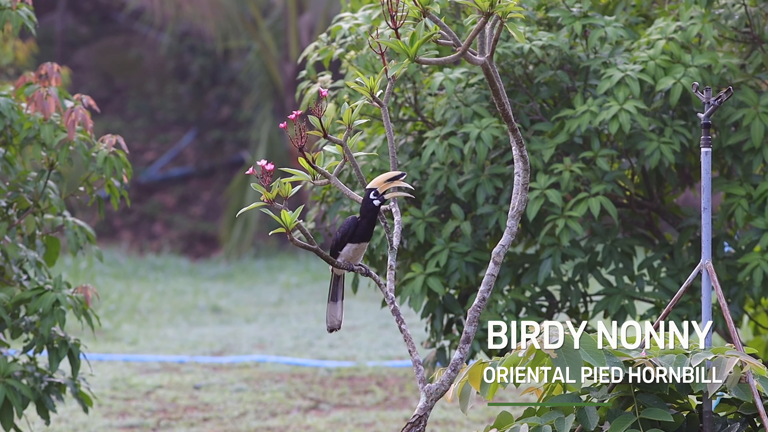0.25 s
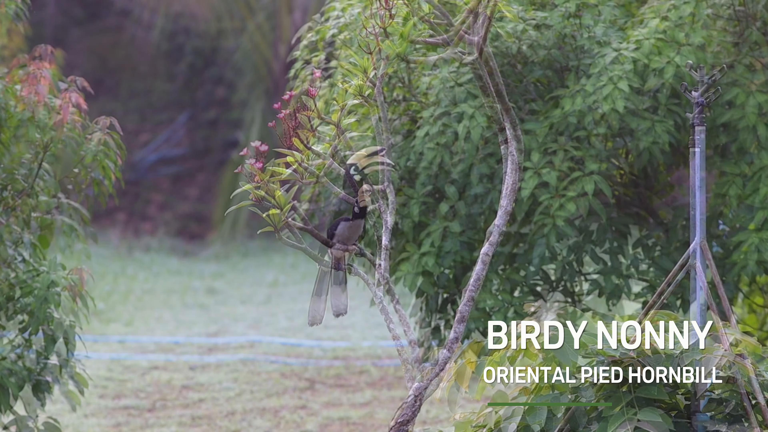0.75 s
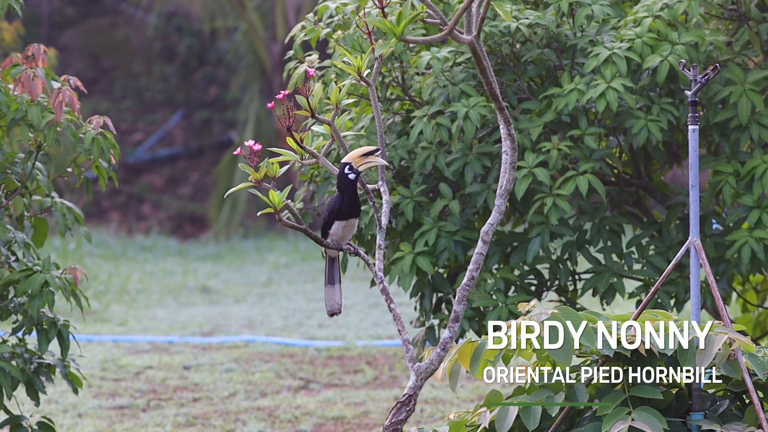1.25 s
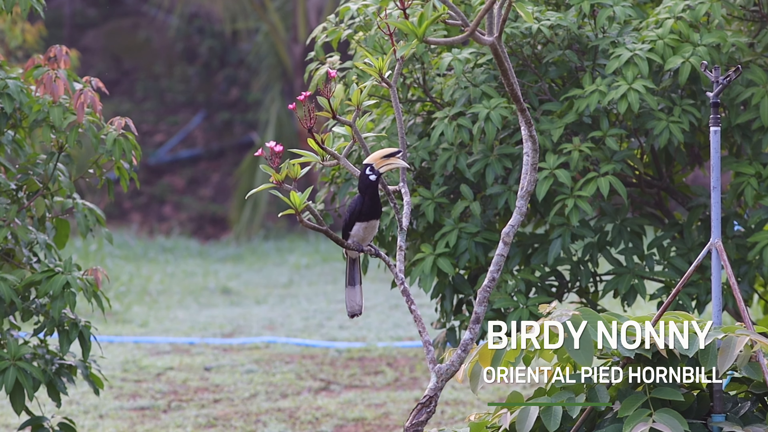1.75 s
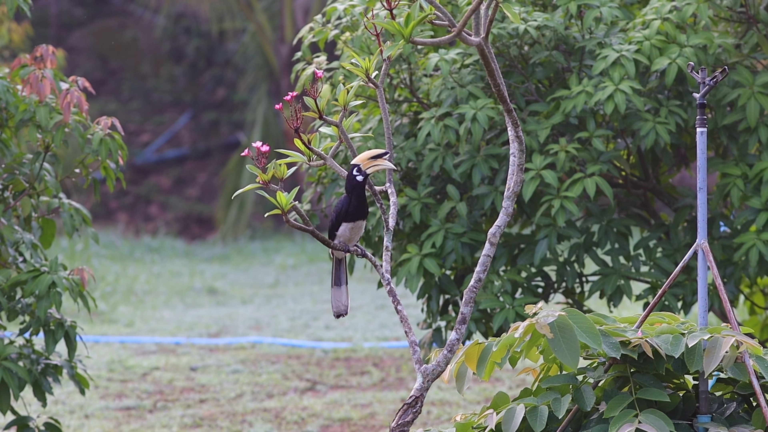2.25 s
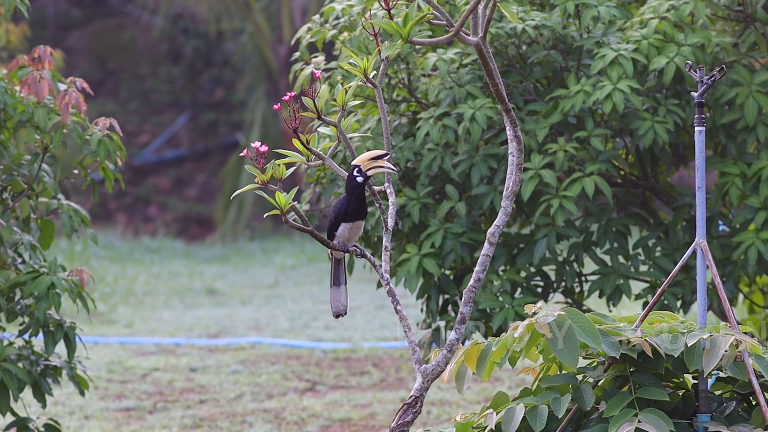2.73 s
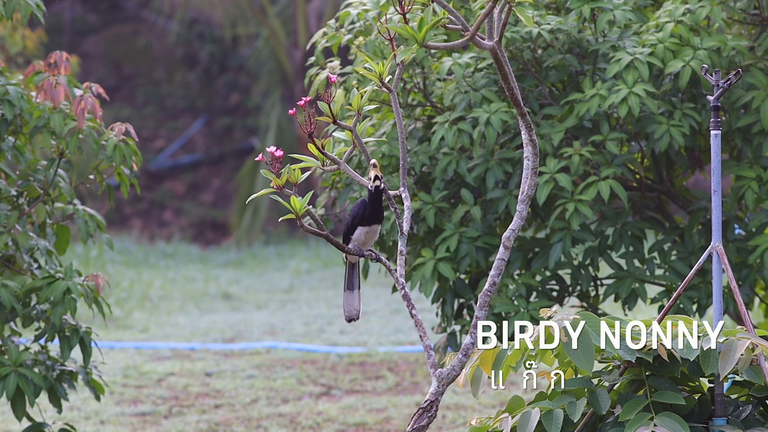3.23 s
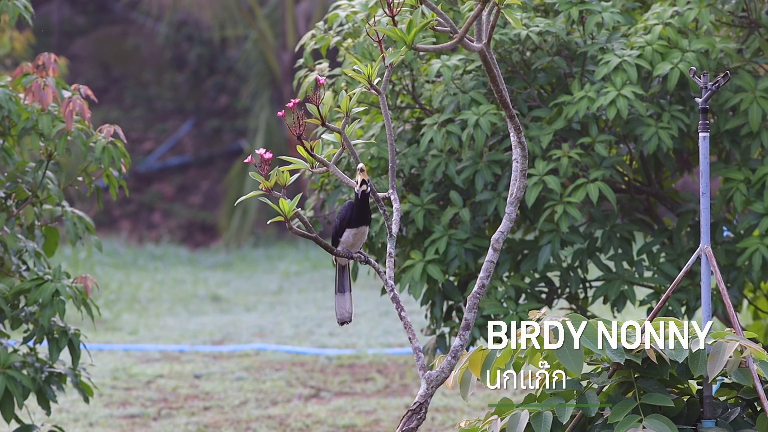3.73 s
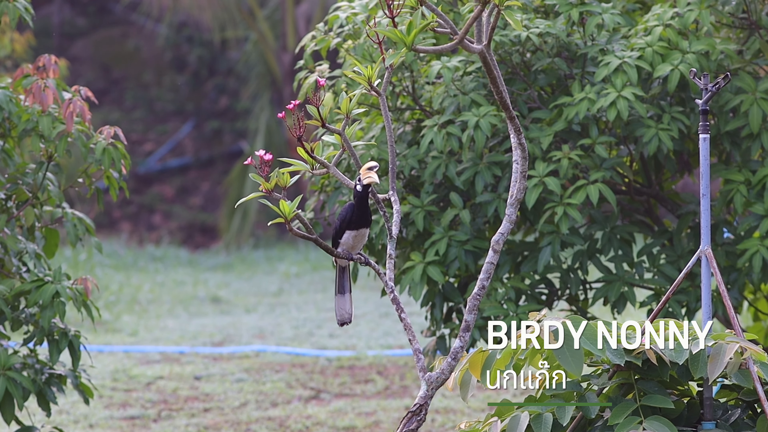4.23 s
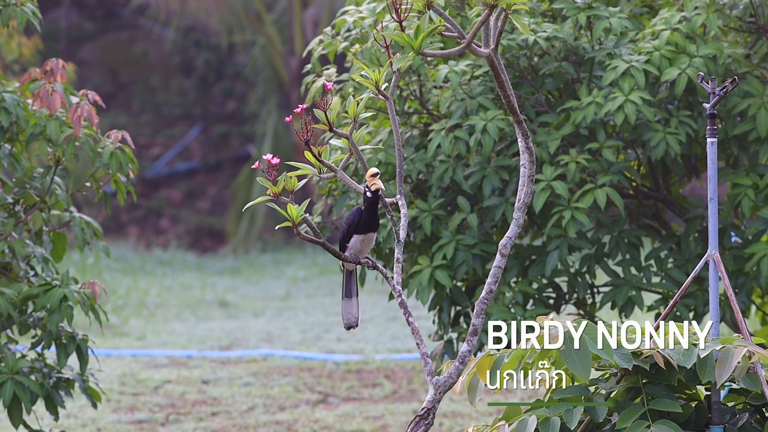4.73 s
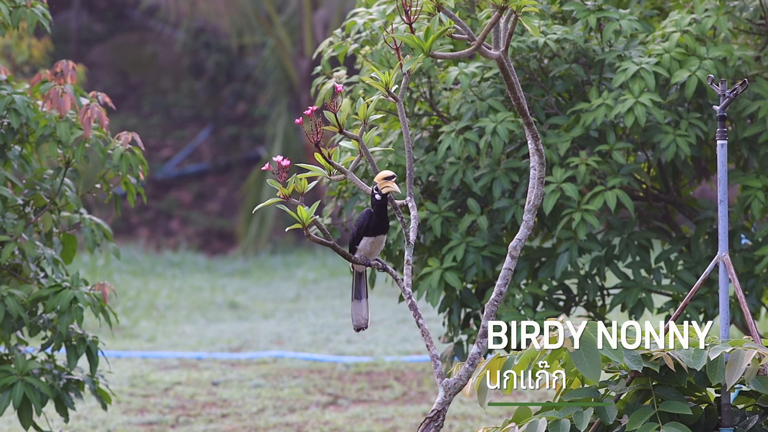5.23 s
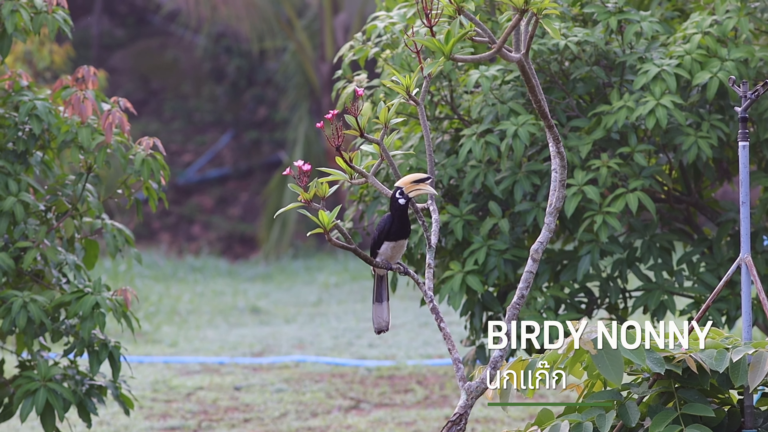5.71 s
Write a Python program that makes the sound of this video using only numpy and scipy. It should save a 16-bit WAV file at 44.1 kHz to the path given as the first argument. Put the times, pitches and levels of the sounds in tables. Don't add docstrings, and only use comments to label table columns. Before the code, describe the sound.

A hornbill cackles close by in two bursts of short harsh notes, split by a gap of insects, faint whistles and soft chirps.

```python
import sys
import numpy as np
from scipy import signal
from scipy.fft import rfft, irfft, next_fast_len
from scipy.io import wavfile
from scipy.ndimage import uniform_filter1d, map_coordinates

SR = 44100
rng = np.random.default_rng(int(sys.argv[2]) if len(sys.argv) > 2 else 0)


def transcribe(u):
    v = np.clip(np.atleast_2d(u).T, -1, 1)
    q = np.round(v * 32767).astype(np.int16)
    wavfile.write(sys.argv[1], SR, q)


def makeup_ratio(level_db):
    decades = np.asarray(level_db, float) / 20
    return 10 ** decades


N = 263277
LEAD = SR // 5


def along(points, hz):
    f, value = np.transpose(points)
    return np.interp(np.log(hz + 1), np.log(f + 1), value)


def unit(x):
    return x / np.sqrt(np.mean(x ** 2) + 1e-20)


def wobble(rate_hz, size):
    knots = rng.standard_normal(int(size * rate_hz / SR) + 4)
    return map_coordinates(knots, [np.arange(size) * rate_hz / SR])


def filtered(x, response):
    m = next_fast_len(x.shape[-1] + SR // 4)
    return irfft(rfft(x, m) * response(np.fft.rfftfreq(m, 1 / SR)), m)[..., :x.shape[-1]]


# start_s, length_s, top_slap_rate_hz, level_db, slow_cycle_share_0_to_1
ARCHED_NOTES = [
    (-.11, 0.045, 1275, -16.5, 0.6),
    (.061, 0.054, 1210, -19.5, 0.05),
    (2.773, .057, 1362, -17.5, 0.35),
    (3.162, 0.053, 1262, -12, 0.64),
    (3.315, .053, 1234, -12, 0.2),
    (3.484, 0.055, 1226, -13.5, 0.12),
    (3.967, 0.051, 1243, -13, 0.16),
]
SQUEALED_NOTES = [
    (3.649, .056, 2676, -13, 0.083),
    (3.806, .063, 2718, -13.5, 0.1),
]
LEVEL_NOTES = [(2.995, .057, 2120, -15, .12), (4.129, .05, 1460, -17.5, .13)]
RISING_NOTES = [(.231, .045, 1430, -21, .28)]
# start_s, length_s, start_hz, end_hz, level_db
CLUCKS = [(.419, .014, 1152, 1146, -34)]


def near_hornbill():
    hoarse, shrill, pure = (.45, .3, .22), (.45, .38, .1), (.35, .16, .05)
    voices = [
        (ARCHED_NOTES, hoarse,
         dict(count=2, creak=0.99, dip=.86, fall=0.78, end=0.72, hold=.5, drop=.03, tilt_db=-0.5)),
        (SQUEALED_NOTES, shrill,
         dict(count=4, creak=1, dip=.8, fall=.75, end=.7, hold=.67, drop=.009, tilt_db=-6)),
        (LEVEL_NOTES, pure,
         dict(count=3, creak=0.96, dip=0.86, fall=0.94, end=0.93, hold=0.567, drop=.03, tilt_db=0.5)),
        (RISING_NOTES, pure,
         dict(count=3.5, creak=.6, dip=.93, fall=.985, end=0.79, hold=0.56, drop=.03, tilt_db=1))]
    notes = [note(*row, **voice, quality=quality) for rows, quality, voice in voices for row in rows]
    return cackle(notes + [croak(*row) for row in CLUCKS])


def note(start_s, length_s, hz, db, top_slow, count, creak, dip, fall, end, hold, drop, tilt_db, quality):
    slow, rough, clear = quality
    creak_s, snap_s, climb_s, release_s = .0095, .0025, .01, .011
    creak_slow, creak_rough = .9, .2
    snap = creak_s + snap_s
    top = snap + climb_s
    held = np.clip(hold * length_s, top + .001, length_s - release_s - .001)
    halfway = dip + 0.782 * (1 - dip)
    rows = [(0, count * creak * 680, -14, creak_slow, creak_rough),
            (creak_s, count * creak * 755, 4, creak_slow, creak_rough),
            (snap, dip * hz, 1, slow, rough),
            (snap + climb_s / 2, halfway * hz, 0, top_slow, clear),
            (top, hz, 0, top_slow, clear),
            (held, hz, 0, top_slow, clear),
            (min(held + drop, length_s - release_s), fall * hz, 0.3, slow, rough),
            (length_s, end * hz, -6.5, slow, rough)]
    gape_db = 0.44 * (db + 22.5)
    return count, np.array(rows) + [start_s, 0, db, 0, 0], tilt_db + gape_db


def croak(start_s, length_s, start_hz, end_hz, db):
    u = np.array([0, .18, 1 - .35, 1])
    level_db = db - 12 * np.array([1, 0, 0, 1])
    slow, rough = np.full(4, .5), np.full(4, .45)
    return 2, np.transpose([start_s + length_s * u, start_hz + (end_hz - start_hz) * u, level_db, slow, rough]), 0


def cackle(notes):
    out = np.zeros(N + LEAD)
    for group, rows, tilt_db in notes:
        s, *columns = np.transpose(rows)
        at = np.arange(round(s[0] * SR), round(s[-1] * SR))
        hz, db, slow, rough = [np.interp(at / SR, s, c) for c in columns]
        rough, group = np.clip(rough, 0, 1), round(group)
        jitter = 1 + .04 * rough * wobble(600, len(at))
        turn = np.cumsum(hz * jitter) / SR / group
        k = np.arange(1, 40)[:, None]
        share = np.where(k % group == 0, 1, np.clip(slow, 0, 1)) * (k * hz / group < 15000)
        share = share / np.sqrt(np.mean(share ** 2, axis=0))
        flicker = makeup_ratio(2.5 * np.array([wobble(80, len(at)) for _ in k]))
        spread = rng.normal(0, .7, k.shape)
        slaps = np.sum(share * flicker * np.cos(2 * np.pi * k * turn + spread), axis=0)
        slaps = slaps * makeup_ratio(4 * rough * wobble(800, len(at)))
        breath = rng.standard_normal(len(at)) * (1 + .9 * np.cos(2 * np.pi * turn * group))
        voiced = unit(slaps) * (1 - rough) + (.04 + .8 * rough) * breath
        bill = lambda f: throat(f) * makeup_ratio(tilt_db * np.log2((f + 300) / 3000))
        loud = np.sqrt(np.mean(filtered(voiced, bill) ** 2))
        sound = filtered(np.pad(voiced * makeup_ratio(db) / loud, (0, LEAD // 10)), bill)
        out[at[0] + LEAD:][:len(sound)] += sound
    return out


# centre_hz, width_hz, level_db
THROAT_MODES = [(1140, 2040, -8.5), (2180, 585, 1.5), (2590, 263, -1.5), (3250, 530, 0), (4330, 696, -0.5),
                (5560, 1230, -3.5), (6830, 740, -6), (8570, 1360, -17.5), (13113, 2825, -38)]


def throat(f):
    body = 0
    for k, (centre, width, db) in enumerate(THROAT_MODES):
        loss = 1j * f * width
        body = body + (-1) ** k * makeup_ratio(db) * loss / (centre * centre - f * f + loss)
    pocket = (1620 ** 2 - f * f + 1j * f * 200) / (1620 ** 2 - f * f + 1j * f * 800)
    radiation = (f * f / (f * f - 1700 ** 2 - 1j * f * 1500)) ** 2
    return body * pocket * radiation / (1 + 1j * f / 7000) ** 3


# frequency_hz, t60_s
GARDEN_DECAY = [(1000, 0.64), (3000, 0.33), (7000, 0.43), (13000, 0.32)]
# delay_s, level_db
WALL_ECHOES = [
    (0.037, -5.5),
    (.05, -17.5),
    (0.069, -25),
]


def garden(x):
    hz, t, z = signal.stft(rng.standard_normal((2, SR // 2)), SR, nperseg=256)
    decay = makeup_ratio(-60 * t / along(GARDEN_DECAY, hz)[:, None])
    tail = signal.istft(z * decay, SR, nperseg=256)[1]
    t = np.arange(tail.shape[1]) / SR
    echoes = sum(makeup_ratio(db + 7.5) * np.exp(-((t - s) / 0.0014) ** 2) for s, db in WALL_ECHOES)
    tail = tail * (np.clip(t / 0.0054, 0, 1) + echoes)
    power = abs(rfft(tail)) ** 2
    even = uniform_filter1d(power, size=800, axis=1) / uniform_filter1d(power, size=40, axis=1)
    tail = irfft(rfft(tail) * np.sqrt(even), tail.shape[1])
    return signal.fftconvolve(x[None], tail / np.linalg.norm(tail[0]), axes=1)[:, :x.shape[-1]]


# start_s, length_s, start_hz, end_hz, level_db
FAR_CROAKS = [
    (.46, 0.084, 1093, 1167, -42.5),
    (0.634, 0.089, 1067, 1518, -44.5),
    (0.819, .11, 1198, 1500, -46),
    (.94, 0.077, 1750, 2061, -44),
    (5.539, .12, 1363, 1764, -58),
    (5.74, 0.043, 960, 1060, -57),
]


def far_hornbill():
    dull = lambda f: (1j * f * 1200 / (2700 ** 2 - f * f + 1j * f * 1200)) ** 2
    return filtered(cackle([croak(*row) for row in FAR_CROAKS]), dull) * makeup_ratio(10.0)


# start_s, length_s, pitch_hz, level_db
PIPER_WHISTLES = [(.54, .12, 1940, -56), (.95, .26, 1805, -44.5), (1.08, .23, 2080, -44.5),
                  (1.3, .12, 1568, -53), (1.99, .2, 3895, -52), (2.46, .12, 2660, -51),
                  (2.42, .2, 3630, -55), (2.585, .22, 1803, -46.5), (2.71, .12, 2078, -47),
                  (4.29, .22, 1805, -47), (4.4, .16, 2057, -55)]
# start_s, length_s, start_hz, end_hz, level_db
GLIDING_CHIRPS = [(1.36, .06, 3300, 3130, -47), (1.4, .05, 2650, 2550, -48), (1.66, .12, 1870, 1945, -45),
                  (1.81, .07, 3190, 3230, -45), (1.86, .06, 2590, 2700, -48), (1.93, .05, 2195, 2280, -44),
                  (2.11, .05, 2305, 2250, -49), (4.51, .11, 1620, 1555, -47), (5.74, .05, 1930, 2000, -51),
                  (4.695, .08, 2480, 1700, -45), (4.77, .09, 1750, 2380, -47), (4.79, .07, 1560, 2000, -50)]
# start_s, level_db
DOVE_COOS = [
    (1.08, -48),
    (3.15, -51),
    (5.23, -49),
    (5.48, -48),
]


def songbirds():
    out = np.zeros(N + SR)
    sag = .006 / 2
    songs = [(s, length, hz * (1 + sag), hz * (1 - sag), db) for s, length, hz, db in PIPER_WHISTLES]
    songs += [tuple(row) for row in GLIDING_CHIRPS]
    songs += [(s, .14, 587.5, 587.5, db) for s, db in DOVE_COOS]
    for s, length, start_hz, end_hz, db in songs:
        u = np.linspace(-1, 1, round(length * SR))
        hz = (start_hz + end_hz) / 2 + (end_hz - start_hz) / 2 * u
        hz = hz * (1 + .005 * wobble(70, len(u)))
        swell = (1 + u) ** .25 * (1 - u) ** .5 * makeup_ratio(db + 4 + 3 * wobble(40, len(u)))
        out[round(s * SR):][:len(u)] += swell * np.sin(2 * np.pi * np.cumsum(hz) / SR)
    return out[:N]


# frequency_hz, correlation
STEREO_LIKENESS = [(60, 0.98), (180, 0.95293), (550, 0.91), (1650, 0.2), (4970, -0.28), (15000, 0.22)]


def rush(spectrum, patchy_db):
    z = signal.stft(rng.standard_normal((2, N)), nperseg=512)[2]
    patches = uniform_filter1d(rng.standard_normal(z.shape[1:]), size=5, axis=0)
    patches = uniform_filter1d(patches, size=16, axis=1)
    pair = signal.istft(z * makeup_ratio(patchy_db * unit(patches)), nperseg=512)[1][:, :N]
    turn = lambda hz: np.arccos(np.clip(along(STEREO_LIKENESS, hz), -1, 1)) / 2
    mid, side = filtered(pair, lambda hz: makeup_ratio(along(spectrum, hz)) * [np.cos(turn(hz)), np.sin(turn(hz))])
    return unit(np.array([mid + side, mid - side]))


# time_s, gain_db
BACKGROUND_GAIN = [(0, -9), (.38, -5.5), (.826, -5), (.83, 2), (1.24, 0.04), (2.75, 0.26), (3.7, -4),
                   (4.1, -3.5), (4.6, -0.4), (5.97, 0)]


def background_gain_db():
    return np.interp(np.arange(N) / SR, *np.transpose(BACKGROUND_GAIN))


# frequency_hz, level_db_per_hz
INSECT_SPECTRUM = [(880, -32), (1500, -9.5), (1620, -3.5), (1880, -1.5), (2330, -5.5), (3740, -3.5),
                   (4130, -6.5), (4930, -5.5), (5890, -23.5), (6500, -22.5), (8450, -78), (14300, -120)]
# time_s, level_db
INSECT_LULL = [(0, 7), (.4, 6.5), (.7, -0.65), (4.7, 0.5), (5.35, -7.5), (5.97, -8.5)]


def insects():
    lull_db = np.interp(np.arange(N) / SR, *np.transpose(INSECT_LULL))
    return makeup_ratio(-43.5 + background_gain_db() + lull_db) * rush(INSECT_SPECTRUM, patchy_db=3.0)


# time_s, level_db
CICADA_SWELL = [(4.3, -78), (4.9, -54), (5.75, -55), (5.84, -50.5), (5.97, -49)]


def cicada():
    level_db = np.interp(np.arange(N) / SR, *np.transpose(CICADA_SWELL), left=-90)
    spectrum = [(4000, -42), (4500, 0.5), (5100, -7), (5600, -13), (5900, -61)]  # (Hz, dB per Hz)
    return makeup_ratio(level_db) * rush(spectrum, patchy_db=-1.5)


# frequency_hz, level_db_per_hz
HISS_SPECTRUM = [(3240, -60), (5500, -30.5), (6260, -3), (6680, 10.5), (12600, -2), (13400, 5),
                 (14500, -56)]
# time_s, peak_db
TWIG_SNAP = [
    (4.7631, -50),
]


def hiss_and_twig():
    t = np.arange(N) / SR
    twig = sum(makeup_ratio(db - 8 - 60 * abs(t - s) / np.where(t > s, .09, .008)) for s, db in TWIG_SNAP)
    return (makeup_ratio(-68 + background_gain_db()) + twig) * rush(HISS_SPECTRUM, patchy_db=-2.0)


# frequency_hz, level_db
PUMP_TONES = [(1125, -60), (1174, -63), (1222, -56)]


def pump():
    t = np.arange(N) / SR
    whine = 0
    for hz, db in PUMP_TONES:
        level = makeup_ratio(db + 6 + 0.44 * wobble(17, N))
        whine = whine + level * np.sin(2 * np.pi * hz * t + 0.38 * wobble(29, N))
    return makeup_ratio(background_gain_db()) * whine


# frequency_hz, level_db_per_hz
TRAFFIC_SPECTRUM = [(15, -40.5), (25, -25), (92, -3), (123, -7), (238, 0), (481, -8), (579, -4),
                    (629, -7.5), (823, -8), (1240, -12.5), (1380, -13), (1630, -15.5), (2510, -18),
                    (2730, -26.5), (3500, -33), (4550, -57), (7700, -120)]


def traffic():
    return makeup_ratio(-43 + background_gain_db()) * rush(TRAFFIC_SPECTRUM, patchy_db=1.55)


def scene():
    near, far, song = near_hornbill(), far_hornbill(), songbirds()
    bird = near * makeup_ratio(-3.05) + makeup_ratio(-5.5) * garden(near)
    bird = bird + makeup_ratio(-2.5) * far + makeup_ratio(1.5) * garden(far)
    song = makeup_ratio(-3) * song + makeup_ratio(-4) * garden(song)
    background = insects() + cicada() + hiss_and_twig() + pump() + traffic()
    return (bird[:, LEAD:] * makeup_ratio([[-1.8], [1.8]]) + song * makeup_ratio([[-1.2], [1.2]])
            + background * makeup_ratio([[-1.1], [1.1]]))


def band_limit(x):
    return signal.sosfilt(signal.butter(12, 15800, fs=SR, output="sos"), x)


def record(dry):
    phase = np.array([[0], [1.9]])
    whine = makeup_ratio(-60) * np.sin(2 * np.pi * 15569 * np.arange(N) / SR + phase)
    soft = dry / (1 + abs(dry / .95) ** 5) ** (1 / 5)
    mix = filtered(soft, lambda f: 1 / (1 + (f / 13700) ** 40)) + whine
    return band_limit(mix)


dry = scene()
out = record(dry)
transcribe(out)
```